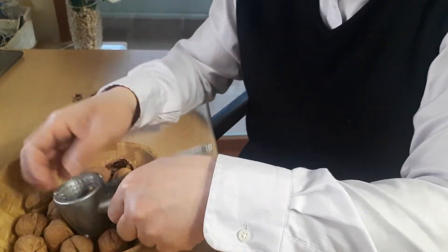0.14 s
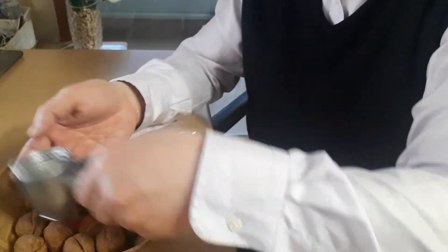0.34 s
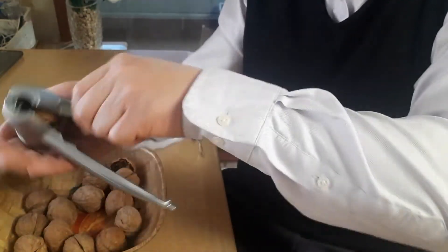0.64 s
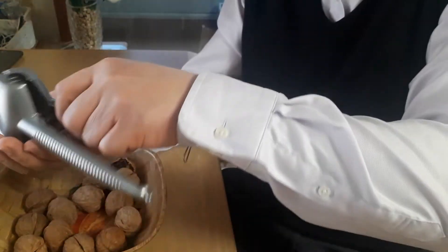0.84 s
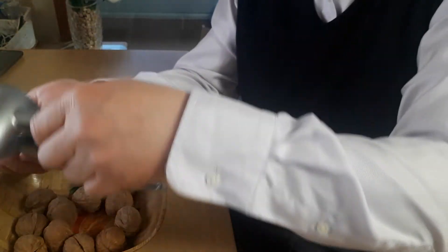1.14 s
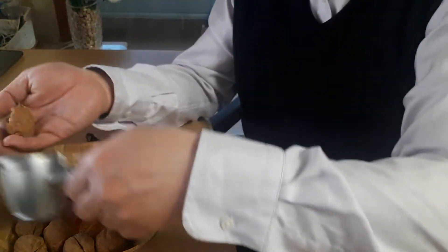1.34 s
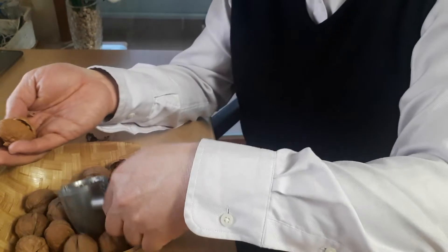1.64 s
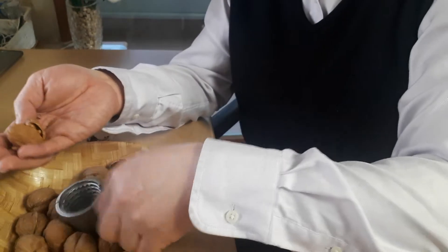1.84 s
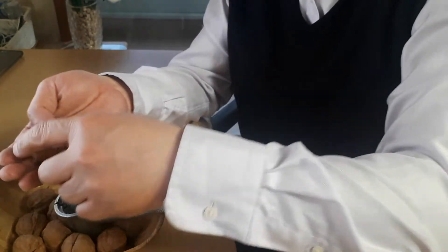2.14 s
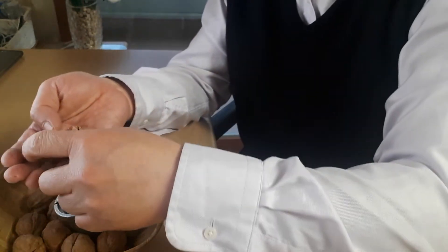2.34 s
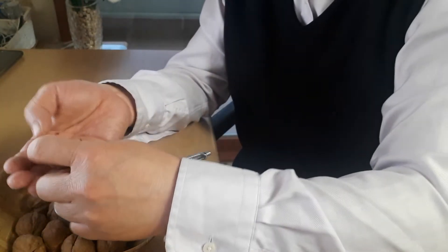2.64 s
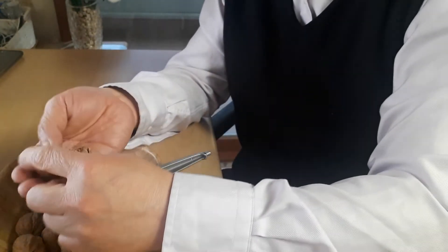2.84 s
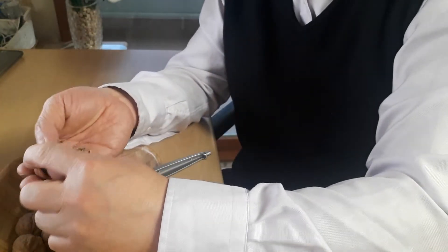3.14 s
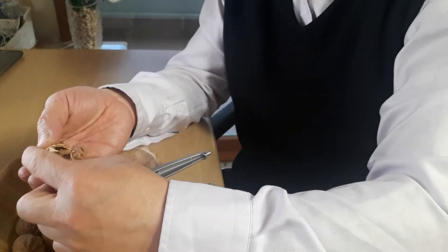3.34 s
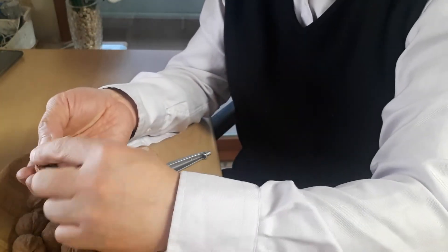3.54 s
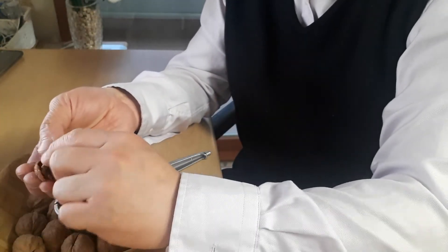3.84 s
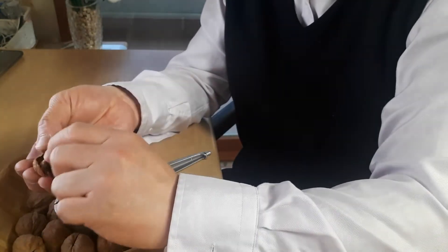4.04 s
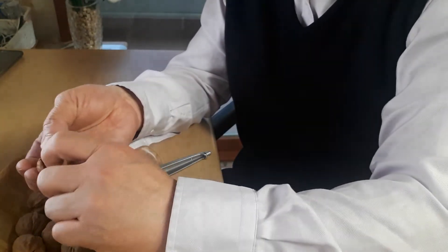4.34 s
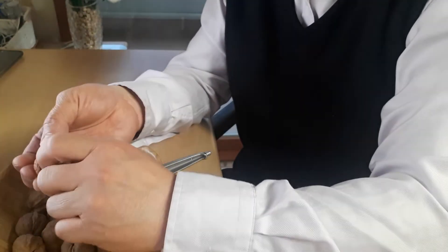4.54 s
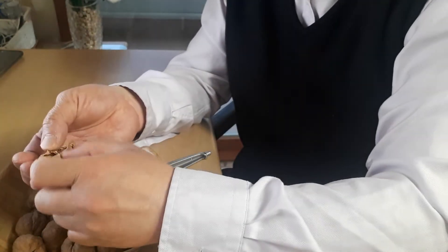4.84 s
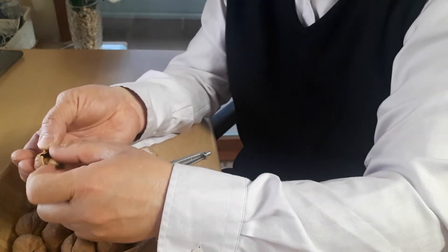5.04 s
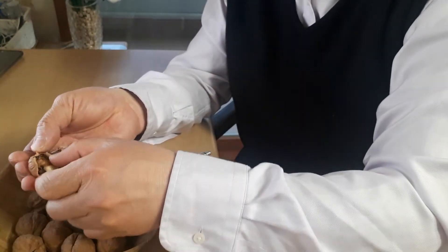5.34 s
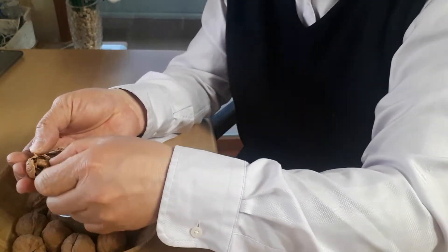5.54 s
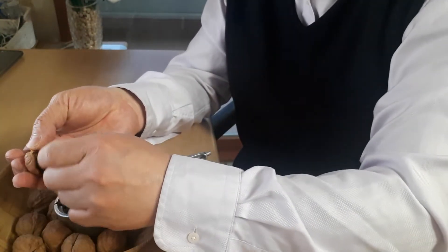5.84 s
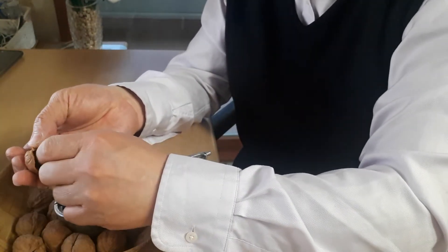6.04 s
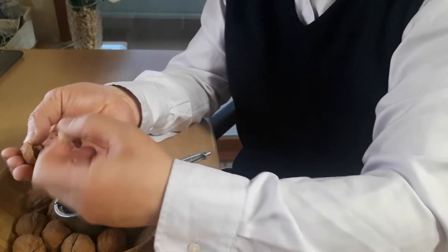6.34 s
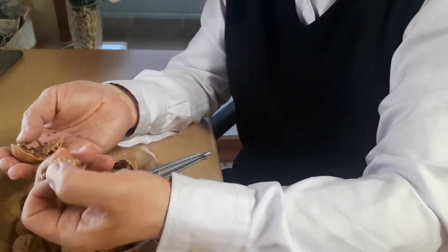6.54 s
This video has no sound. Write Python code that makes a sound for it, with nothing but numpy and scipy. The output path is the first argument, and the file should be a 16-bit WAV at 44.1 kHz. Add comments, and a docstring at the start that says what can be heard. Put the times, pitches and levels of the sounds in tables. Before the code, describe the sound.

At the start, a walnut and a metal nutcracker bump lightly among other nuts. From about 0.6 to 0.9 seconds the shell gives way in a splintery crunch with a short metallic ring. Faint clinks follow just after 1 second. From 1.5 to 2 seconds comes the loudest sound: the cracker clatters onto nuts in a wooden basket, in a quick run of hollow knocks and thuds. From about 2.6 seconds, fingers rub the shell in soft, grainy strokes and break off brittle bits with small, crisp ticks. The snaps grow busier between 4.4 and 6.3 seconds, with a tiny shell creak around 5.5 seconds. Two very faint tones waver and rise near 6.5 seconds. Everything sounds close, in a small room with a slight echo, a soft appliance hum and thin hiss.

```python
"""A walnut knocks into the cup of a metal nutcracker, cracks under the squeeze and is tipped out; the
cracker clatters down among the nuts in a wooden basket. Fingers then rub and snap shell off the kernel.
Each contact is a splintery noise burst through hollow resonances; the tool's blows add ringing metal,
and the rubbing is grainy friction noise. A small room answers, two faint tones waver near the end,
and an appliance hums softly behind."""
import sys
import numpy as np
from scipy import signal
from scipy.fft import rfft, irfft, next_fast_len
from scipy.io import wavfile
from scipy.ndimage import map_coordinates

SR = 44100
rng = np.random.default_rng(int(sys.argv[2]) if len(sys.argv) > 2 else 0)


def store_pcm(level_fs):
    """Save levels as 16-bit WAV."""
    pcm = np.round(np.clip(level_fs, -1, 1) * 32767).astype(np.int16)
    wavfile.write(sys.argv[1], SR, np.atleast_2d(pcm).T)


N = 294978

# Resonances of the hollow nuts. Each row: pitch in Hz, width in Hz, level in dB.
NUT_MODES = [(700, 280, -7.5), (1144.6, 450, -2), (1619, 140, -0.5), (2060, 160, -1.5), (2680, 610, -4),
             (3232, 370, -1), (3944, 740, -13.5)]


def basket_clatter():
    """The cracker tumbles onto the nuts in a quick run of loud knocks and thuds."""
    # Each row: start in seconds, level in dB, crack and thud in relative dB, knock and nut pitch in Hz.
    hits = [(1.532, -11.5, -26.5, -7, 401, 2160), (1.548, -13.5, -12.5, -12, 386.3, 2230),
            (1.555, -9, -15, -20, 197.9, 2283), (1.59, -13, -16, -15, 108.8, 2020),
            (1.625, -14, -24, -11.5, 395, 2330), (1.646, -10.5, -24, -16.5, 440.6, 1037),
            (1.656, -9.5, -21, -15, 408, 1002), (1.679, -12, -19.5, -15.5, 407.3, 1095),
            (1.702, -7, -20, -18.5, 317.3, 3004), (1.721, -7.5, -18.5, -13.5, 207, 1568),
            (1.743, -14.5, -12.5, -8, 118, 1540), (1.879, -6, -11.5, -23, 208, 2128),
            (1.896, -5, -14.5, -18.5, 263.2, 2670), (1.906, -8, -21, -19.5, 532.3, 1990),
            (1.936, -15, -18, -20.5, 301, 2206), (1.946, -11, -18.5, -22, 147, 2126)]
    contacts = knocks(*np.transpose(hits)[:3], t60=0.04, sway_db=1.5,
                      body=NUT_MODES, body_db=-5, crack_db=3.5, metal_db=-29)
    return contacts + thuds(hits, basket_db=2, knock_db=4.5, shell_db=-7.5, t60=0.065)


def nut_loading():
    """Nut and tool bump lightly among the other nuts as the cup is loaded."""
    # Each row: start in seconds, level in dB, crack and thud in relative dB, knock and nut pitch in Hz.
    hits = [(0.11, -28, -20.5, -24, 254, 2184), (0.127, -34.5, -23, -10, 266, 1610),
            (0.143, -37.5, -13, -8.5, 350, 970), (0.201, -32.5, -14.5, -15.5, 184, 984),
            (0.246, -33.5, -15, -10, 372, 2376), (0.255, -34, -14.5, -12.5, 147, 1033)]
    contacts = knocks(*np.transpose(hits)[:3], t60=0.035, sway_db=3,
                      body=NUT_MODES, body_db=-5.5, crack_db=2.5, metal_db=-28)
    return contacts + thuds(hits, basket_db=6.5, knock_db=6.5, shell_db=-5, t60=0.022)


def squeeze(crackles=16, scatter_db=4, crackle_edge_db=-5):
    """The shell gives way inside the resonant cup: loud breaks with small crackles scattered between."""
    # The loud breaks. Each row: start in seconds, level in dB, bright crack in relative dB.
    breaks = [(0.666, -37, -15), (0.6841, -34, -2.5), (0.697, -27, -9), (0.7137, -40, -8.5),
              (0.736, -32, -9), (0.7801, -33.5, -6), (0.823, -34, -14), (0.8374, -35.5, -4.5),
              (0.8584, -35, -3)]
    # Crackle under the grip. Each row: time in seconds, level in dB.
    grip = [(0.639, -50), (.69, -41.5), (.76, -42.5), (.83, -39), (.866, -47)]
    # Resonances of the closed cup. Each row: pitch in Hz, width in Hz, level in dB.
    cup_modes = [(1362, 117, 5.5), (2050, 380, 2.5), (2460, 390, 0.5), (3150, 180, 8), (4400, 430, -29)]
    grip_s, grip_db = np.transpose(grip)
    jitter, strength = rng.random((crackles, 2)).T
    starts = grip_s[0] + (np.arange(crackles) + jitter) / crackles * (grip_s[-1] - grip_s[0])
    levels_db = np.interp(starts, grip_s, grip_db) + scatter_db * (2 * strength - 1)
    cracks = np.hstack([np.transpose(breaks), [starts, levels_db, np.full(crackles, crackle_edge_db)]])
    return knocks(*cracks, t60=0.027, sway_db=4, body=cup_modes, body_db=-5.5, crack_db=4.5, metal_db=-29)


def tool_rings():
    """The cracker rings: first a faint metal creak that swells as the grip tightens, then its jaws touch and
    ring."""
    # Each row: start in seconds, level in dB, tilt in dB per octave away from the main mode.
    clinks = [(.562, -67, -25), (.587, -60, -26), (.615, -56, -24), (0.641, -52.5, -11), (0.666, -44, -37),
              (.697, -32.5, -26), (1.12, -53, -2.5), (1.157, -51.5, 8), (1.251, -50.5, -0.5)]
    return metal_ring(*np.transpose(clinks))


def knocks(starts, levels_db, edges_db, t60, sway_db, body, body_db, crack_db, metal_db):
    """Hard contacts: a hollow body and a bright crack, a little left or right, plus ringing metal."""
    # Colour of a crack. Each row: frequency in Hz, level in dB.
    crack_spectrum = [(2530, -34.5), (4300, -6), (5320, -4.5), (7490, -8), (9850, -20.5), (12600, -14),
                      (15700, -24.5), (16400, -31)]
    pans_db = sway_db * rng.standard_normal(len(starts))
    rows = zip(starts, levels_db, pans_db, np.full(len(starts), t60), edges_db)
    force, edge, _ = bursts(rows, alike=0.3, rise_s=0.00055)
    hollow = amp(body_db) * filtered(force, modes(body))
    crack = amp(crack_db) * filtered(edge, colour(crack_spectrum))
    return hollow + crack + metal_ring(starts, levels_db + metal_db, np.zeros(len(starts)))


def thuds(hits, basket_db, knock_db, shell_db, t60):
    """A blow shakes the basket, leaves a knock pitched by the spot it lands on, and rings a nut."""
    # Low resonances of the wooden basket. Each row: pitch in Hz, width in Hz, level in dB.
    basket_modes = [(121, 62, 1.5), (228, 47, 1), (378.3, 190, 0)]
    push, tones = np.zeros((2, N))
    t = np.arange(SR // 8) / SR
    for start, db, _, thud_db, knock_hz, nut_hz in hits:
        add_at(push, start, amp(db + thud_db - 60 * t / 0.028) * rng.standard_normal(len(t)))
        knock = amp(db + thud_db + knock_db - 60 * t / t60) * np.sin(2 * np.pi * knock_hz * t)
        nut = amp(db + shell_db - 60 * t / 0.042) * np.sin(2 * np.pi * nut_hz * t)
        add_at(tones, start, knock + nut)
    return amp(basket_db) * filtered(push, modes(basket_modes)) + tones


def metal_ring(starts, levels_db, tilts_db, main_hz=3150):
    """Every blow rings the cracker's modes at new strengths; cast metal in a hand rings unevenly."""
    # Each row: pitch in Hz, level in dB, seconds to fall 60 dB.
    metal_modes = [(2200, -9, .08), (3150, 0, .06), (4445, -3, .07), (5560, -3, .055), (7500, -12, .03),
                   (7950, -14, .04), (8440, -8, .025)]
    hz, mode_db, t60 = np.transpose(metal_modes)[..., None]
    octaves_away = np.abs(np.log2(hz / main_hz))
    out, t = np.zeros((2, N)), np.arange(SR // 6) / SR
    attack = np.minimum(t / 0.00033, 1)
    for start, db, tilt_db in zip(starts, levels_db, tilts_db):
        drift = 0.075 * np.cumsum(rng.standard_normal((len(hz), len(t))), 1)
        envelope = attack * amp(db + mode_db + tilt_db * octaves_away - 60 * t / t60)
        spread = amp(rng.normal(0, 2, (2, len(hz), 1)))
        phase = rng.uniform(0, 2 * np.pi, (2, len(hz), 1))
        partials = envelope * spread * np.sin(2 * np.pi * hz * t + drift + phase)
        add_at(out, start, partials.sum(1))
    return out


def shell_snaps(t60=0.012):
    """Brittle bits break off the kernel, each a tick with a hollow body and a glassy top."""
    # Each row: start in seconds, level in dB, body and top in relative dB.
    snaps = [(2.6782, -53, -29, 1.5), (2.7741, -43.5, -31, -13.5), (2.7815, -40.5, -41.5, -17),
             (2.8016, -42.5, -39, -12), (3.8129, -32, -14.5, -38.5), (3.8684, -40.5, -25.5, -36),
             (4.4322, -37.5, -25.5, -13), (4.5134, -40.5, -34.5, -16.5), (4.7336, -40.5, -20, -17.5),
             (4.7479, -26, -38, -14), (4.9688, -30.5, -23, -9), (5.003, -39, -8.5, 1.5),
             (5.0065, -45.5, -12, 7.5), (5.0965, -25.5, -22, 1.5), (5.1397, -37, -28, -3.5),
             (5.1948, -36, -23, -18), (5.357, -47, -32.5, -5.5), (5.6388, -31, -13, -16),
             (5.657, -38, -7, -22), (5.8467, -39.5, -8, -7), (5.888, -47.5, -2.5, -11.5),
             (5.9468, -27, -42, -5), (5.9774, -37.5, -46, -5), (5.985, -36.5, -33, -15.5),
             (5.9964, -36.5, -30, -12.5), (6.0352, -36, -30.5, -15.5), (6.0903, -47.5, -33, -9.5),
             (6.1918, -38, -31, -6), (6.2483, -39, -40, -11)]
    # Where the fingers work. Each row: time in seconds, left over right in dB.
    hand_pan = [(2.6, -7), (3.8, 2.5), (4.7, -4.5), (5.1, 0), (5.95, 3), (6.1, -4)]
    rows = [(s, db, np.interp(s, *np.transpose(hand_pan)), t60, *bands_db) for s, db, *bands_db in snaps]
    tick, body, top = bursts(rows, alike=0.23, rise_s=0.0015)
    tick = amp(2.5) * filtered(tick, modes([(5080, 1830, -2), (7570, 620, 10.5)]))
    body = amp(1.5) * filtered(body, modes([(1000, 520, -13.5), (1807, 240, -11.5), (2650, 450, -13)]))
    top = amp(10) * filtered(top, modes([(10260, 980, -5), (12184, 1680, -2.5), (15000, 1800, -1.2)]))
    return tick + body + top


def finger_rubs(stretch=1.3):
    """Skin rustles over the shell in short strokes, and the hollow shell sounds along."""
    # Each row: start in seconds, length in seconds before the stretch, level in dB.
    strokes = [(1.049, 0.14, -70), (1.405, 0.049, -71), (1.511, 0.036, -55), (2.257, 0.042, -69),
               (2.386, 0.11, -68.5), (2.651, 0.13, -62), (2.752, 0.12, -53), (2.896, 0.07, -61),
               (3.018, 0.061, -61), (3.138, 0.093, -63), (3.278, 0.073, -65.5), (3.396, 0.05, -65),
               (3.483, 0.066, -56), (3.551, 0.063, -66.5), (3.642, 0.047, -62.5), (3.985, 0.078, -72),
               (4.351, .05, -66), (4.428, 0.14, -60.5), (4.657, .08, -68.5), (4.709, 0.13, -55),
               (4.96, 0.074, -57), (5.087, 0.09, -66.5), (5.341, 0.069, -70), (5.432, 0.096, -58),
               (5.586, 0.15, -64), (5.761, 0.051, -63.5), (5.831, 0.08, -50), (5.915, 0.073, -51.5),
               (6.05, 0.073, -63), (6.14, 0.15, -62.5), (6.545, 0.043, -68)]
    # The hollow shell's share. Each row: time in seconds, dB relative to the rustle.
    hollowness = [(1.05, -9), (1.42, 10), (1.51, -18.5), (2.75, -37.5), (4.35, -26.5), (5.0, -15), (5.1, 4),
                  (5.4, -9), (5.87, -7.5), (5.97, -26.5), (6.55, -1)]
    # Colour of the bright rubbing rustle. Each row: frequency in Hz, level in dB.
    rustle_spectrum = [(2000, -43.5), (3500, -22), (4800, -6.5), (6300, -1), (7600, 1), (8900, -17),
                       (12200, -5.5), (14200, -15), (16000, -25.5)]
    shell_modes = [(1452, 300, -7), (2010, 230, -10.5), (2700, 338.5, -2.5), (4356, 835, -3)]
    pressure, resonance = np.zeros((2, N))
    for start, length, db in strokes:
        progress = np.linspace(0, 1, round(stretch * length * SR))
        stroke = amp(db) * np.sin(np.pi * progress ** 0.75) ** 1.5  # presses quickly, eases off slowly
        hollow_db = np.interp(start + length / 2, *np.transpose(hollowness))
        add_at(pressure, start, stroke)
        add_at(resonance, start, amp(hollow_db) * stroke)
    rustle = pressure * filtered(grit(), colour(rustle_spectrum))
    return rustle + resonance * filtered(grit(), modes(shell_modes))


def grit():
    """Dense friction grains: noise whose size jumps every millisecond or so, leaning right."""
    grains = noise_pair(N, alike=0.46) * amp(2 * wobble(700) + 4.4 * wobble(60))
    return grains / np.sqrt(np.mean(grains ** 2)) * amp([[-1.2], [1.2]])


def shell_creak():
    """A shell half is prised open: a rising tone, wavering so fast that it turns rough."""
    # Each row: time in seconds, pitch in Hz, level in dB.
    glide = [(5.435, 1600, -62), (5.462, 2550, -56), (5.55, 2600, -69)]
    return wavering(glide, waver_hz=190, flutter_db=5, rate=500)


def faint_tones():
    """Two faint tones waver and rise near the end."""
    # Each row of both: time in seconds, pitch in Hz, level in dB.
    low = [(6.44, 1044, -83.5), (6.48, 1090, -73), (6.6, 1157, -70), (6.689, 1206, -67.5)]
    high = [(6.47, 1746, -89.5), (6.576, 1746, -74.5), (6.63, 1780, -88.5)]
    return amp(3.5) * sum(wavering(glide, waver_hz=45, flutter_db=4, rate=130) for glide in (low, high))


def room(source):
    """A small room's tail, drawn anew each quarter second; the bass lasts longest and stays central."""
    # Each row: frequency in Hz, seconds to fall 60 dB.
    decay_times = [(80, 0.72), (250, 0.26), (1000, 0.43), (3000, 0.31), (10000, 0.34)]
    out, step = np.zeros((2, N)), SR // 4
    for start in range(0, N, step):
        hz, t, (mid, side) = signal.stft(rng.standard_normal((2, SR // 2)), SR, nperseg=256)
        hz = hz[:, None]
        width = np.clip(0.32 + hz / 2000, 0, 1)
        diffuse = np.array([mid + width * side, mid - width * side]) / np.sqrt(1 + width ** 2)
        walls_db = -4 * np.log2(1 + hz / 4000)  # soft walls swallow treble
        fade = amp(walls_db - 60 * t / along(decay_times, hz))
        tail = signal.istft(diffuse * fade, SR, nperseg=256)[1]
        tail[:, :150] = 0  # pre-delay
        tail /= np.linalg.norm(tail[0])
        add_at(out, start / SR, signal.oaconvolve(source[None, start:start + step], tail, axes=1))
    return out


def background():
    """Room air, an appliance's breathy hum around one wavering motor line, and a thin hiss."""
    # Colour of the air. Each row: frequency in Hz, level in dB.
    air_spectrum = [(15, -48.5), (25, -3), (92, -5.5), (138, -4.5), (207, -14.5), (264, -5), (407, -20),
                    (645, -21), (719, -25), (869, -19), (943, -22.5), (4300, -35.5), (7590, -34.5),
                    (12400, -42.5), (16200, -43)]
    # Resonances of the hum. Each row: pitch in Hz, width in Hz, level in dB (the response is squared).
    hum_modes = [(148, 32, -2), (262.3, 87, -6.5), (367, 98, -9), (659.7, 28, -7.5), (855, 45, -16.5)]
    # Stereo image. Each row: frequency in Hz, left-right likeness (1 alike, -1 or less opposite).
    likeness = [(60, 0.81), (180, 0.76), (550, 0.58), (1650, -0.21), (4970, -0.53), (15000, -1.6)]

    def mid_side_noise(response):
        def split(hz):
            angle = stereo_angle(along(likeness, hz))
            return response(hz) * [np.cos(angle), np.sin(angle)]
        return filtered(rng.standard_normal((2, N)), split)

    air = amp(-64.5) * mid_side_noise(colour(air_spectrum))
    hum = amp(-69.5) * mid_side_noise(lambda hz: modes(hum_modes)(hz) ** 2)
    motor = amp(-61 + 2 * wobble(5.6)) * sine(266.5 + 3 * wobble(5.2))
    hiss_bands = modes([(7500, 2510, -2.5), (12500, 3730, 0.2), (15500, 2200, -2)])
    hiss = amp(-77.5) * filtered(rng.standard_normal((2, N)), hiss_bands)
    mid, side = air + hum
    return np.array([mid + side, mid - side]) + motor + hiss


def bursts(rows, alike, rise_s):
    """A splintery, dying puff of force per contact, on a main track and up to two at relative levels."""
    tracks, t = np.zeros((3, 2, N)), np.arange(SR // 16) / SR
    for start, db, pan_db, t60, *bands_db in rows:
        splinters = np.repeat(amp(rng.normal(0, 2.5, len(t) // 32 + 1)), 32)[:len(t)]
        envelope = amp(db - 60 * t / t60) * np.minimum(t / rise_s, 1)
        pan = amp([[pan_db / 2], [-pan_db / 2]])
        puff = noise_pair(len(t), alike) * splinters * envelope * pan
        for track, band_db in zip(tracks, [0] + bands_db):
            add_at(track, start, amp(band_db) * puff)
    return tracks


def wavering(glide, waver_hz, flutter_db, rate):
    """A tone that follows a glide, unsteady in pitch and level, with 20 ms fades."""
    times, hz, db = np.transpose(glide)
    t = np.arange(N) / SR
    gate = np.clip(np.minimum(t - times[0], times[-1] - t) / 0.02, 0, 1)
    level = amp(np.interp(t, times, db) + flutter_db * wobble(rate))
    return gate * level * sine(np.interp(t, times, hz) + waver_hz * wobble(rate))


def wobble(rate):
    """A smooth random curve, rate knots a second."""
    return map_coordinates(rng.standard_normal(int(N * rate / SR) + 4), [np.arange(N) * rate / SR])


def noise_pair(length, alike):
    """Left and right noises that share part of their waveform."""
    mid, side = rng.standard_normal((2, length))
    angle = stereo_angle(alike)
    return np.cos(angle) * mid + np.sin(angle) * np.array([side, -side])


def filtered(x, response):
    """Shape x by a frequency response, scaled to keep the power of white noise."""
    size = next_fast_len(N + SR // 2)
    gain = response(np.fft.rfftfreq(size, 1 / SR))
    return irfft(rfft(x, size) * gain / np.sqrt(np.mean(np.abs(gain) ** 2)), size)[..., :N]


def modes(resonances):
    """The response of a resonant body. Each row: pitch in Hz, width in Hz, level in dB."""
    return lambda hz: sum((-1) ** k * amp(db) * 1j * hz * width / (pitch ** 2 - hz ** 2 + 1j * hz * width)
                          for k, (pitch, width, db) in enumerate(resonances))


def colour(spectrum):
    return lambda hz: amp(along(spectrum, hz))


def along(points, hz):
    """Interpolate (Hz, value) points on a log frequency axis."""
    knots_hz, values = np.transpose(points)
    return np.interp(np.log(hz + 1), np.log(knots_hz + 1), values)


def stereo_angle(alike):
    return np.arccos(np.clip(alike, -1, 1)) / 2


def sine(hz):
    return np.sin(2 * np.pi * np.cumsum(hz) / SR)


def amp(db):
    return 10 ** (np.asarray(db) / 20)


def add_at(track, start_s, sound):
    span = track[..., round(start_s * SR):][..., :sound.shape[-1]]
    span += sound[..., :span.shape[-1]]


def scene():
    """Cracker and hands at a table slightly to the right, in a small, humming room."""
    creak = shell_creak()
    tool = nut_loading() + squeeze() + basket_clatter() + tool_rings()
    hands = shell_snaps() + finger_rubs() + creak
    direct = tool + hands
    direct[0] = np.roll(direct[0], 5)  # reaches the left five samples later
    reverb = room(amp(-7.5) * tool[0] + amp(-8) * hands[0])
    return direct + reverb + faint_tones() + background()


def record(dry, ceiling=0.95, bass_hz=40, top_hz=17000):
    """Round off the highest peaks, thin the deep bass, and let the top droop before cutting it off."""
    soft = dry / (1 + np.abs(dry / ceiling) ** 6) ** (1 / 6)
    size = next_fast_len(N + SR // 2)
    hz = np.fft.rfftfreq(size, 1 / SR)
    droop = amp(np.interp(hz, [15900, 16200], [0, -24]))
    bass_cut = (1j * hz / (bass_hz + 1j * hz)) ** 5
    return irfft(rfft(soft, size) * bass_cut * droop * (hz < top_hz), size)[:, :N]


dry = scene()
out = record(dry)
store_pcm(out)
```